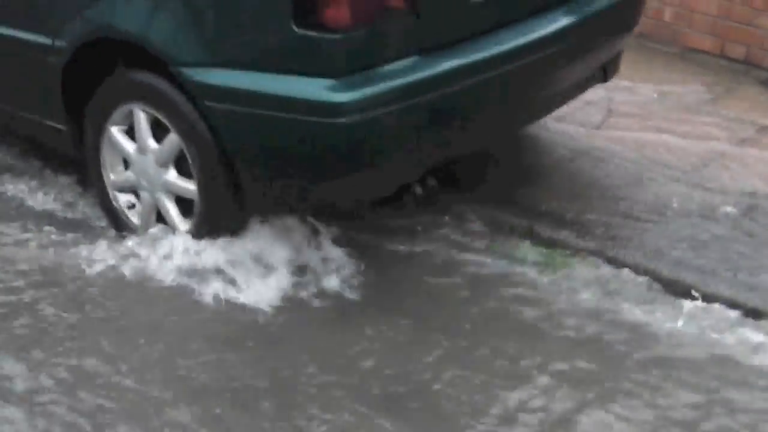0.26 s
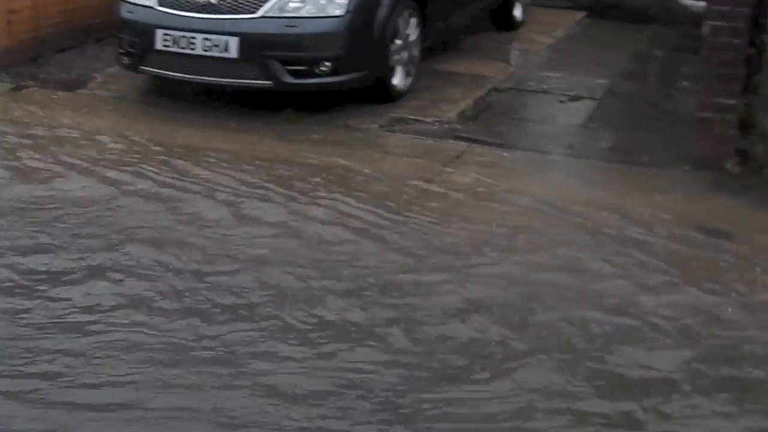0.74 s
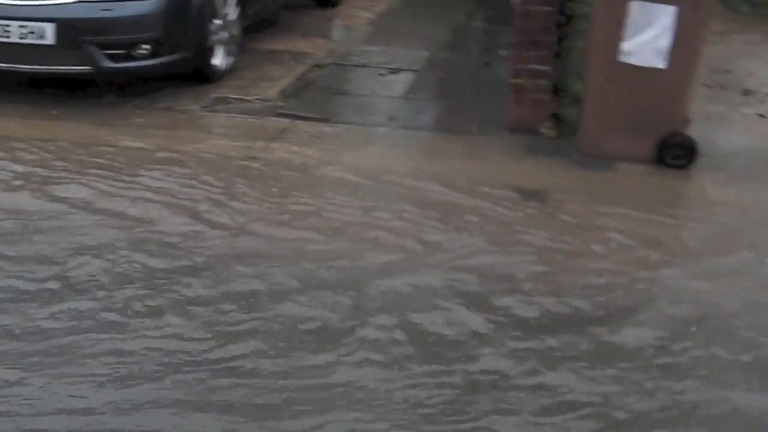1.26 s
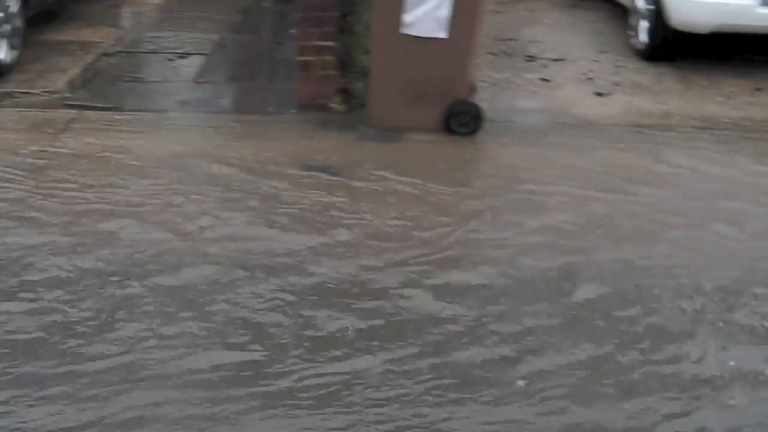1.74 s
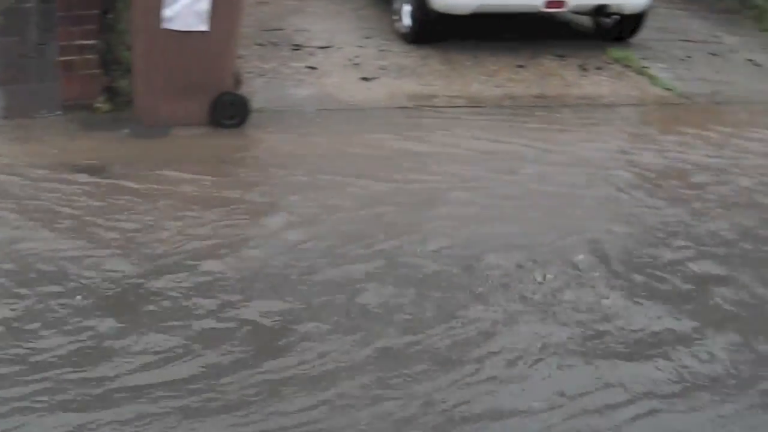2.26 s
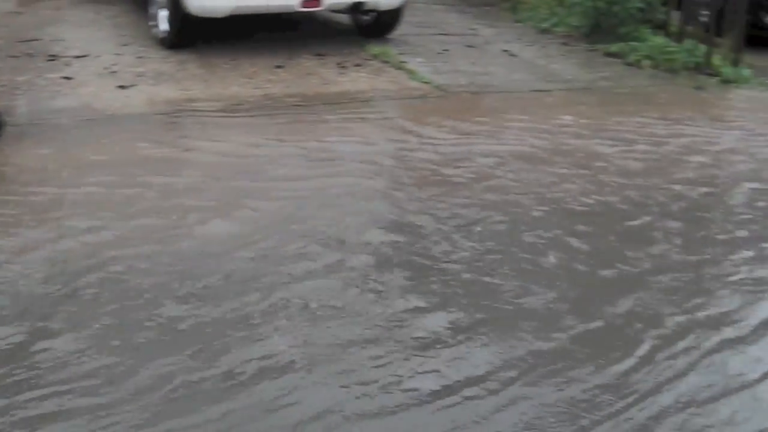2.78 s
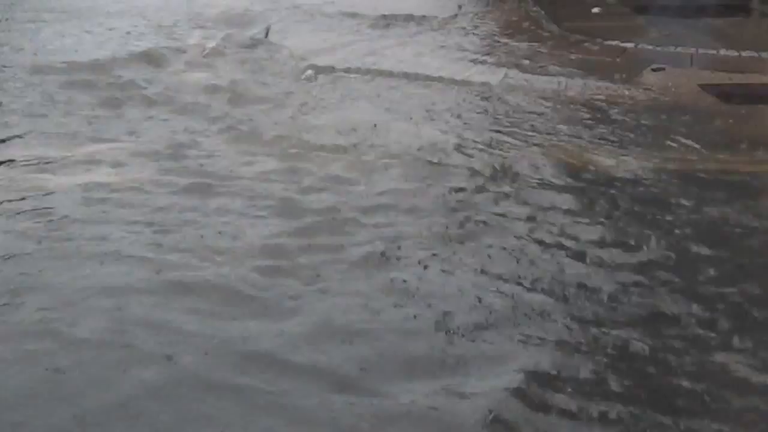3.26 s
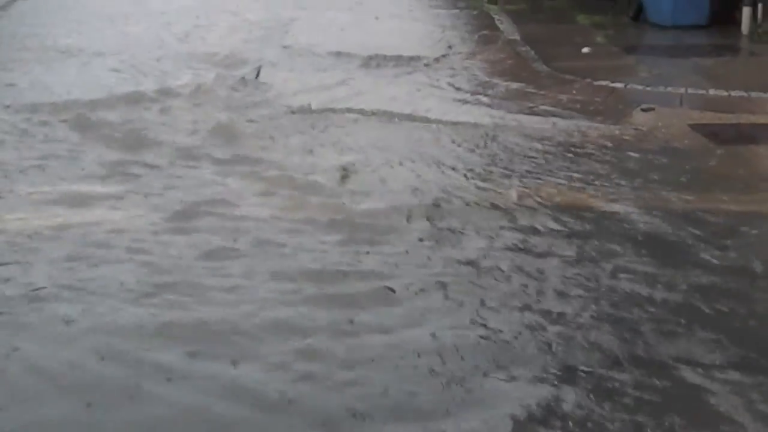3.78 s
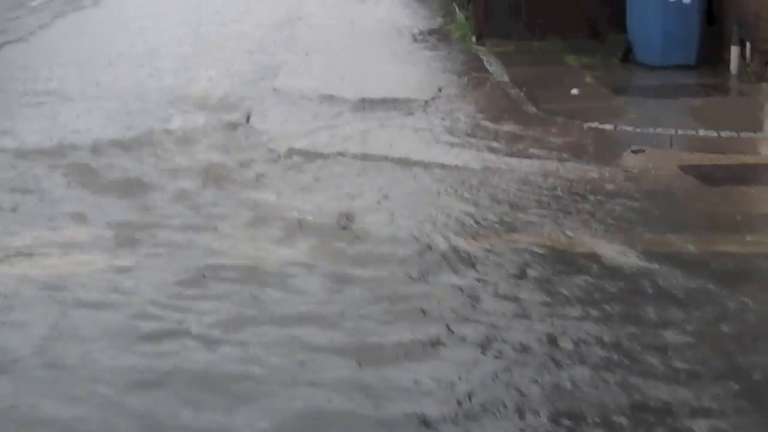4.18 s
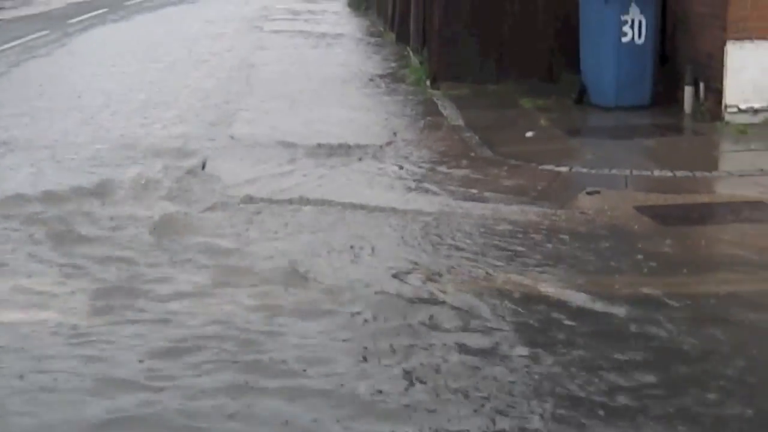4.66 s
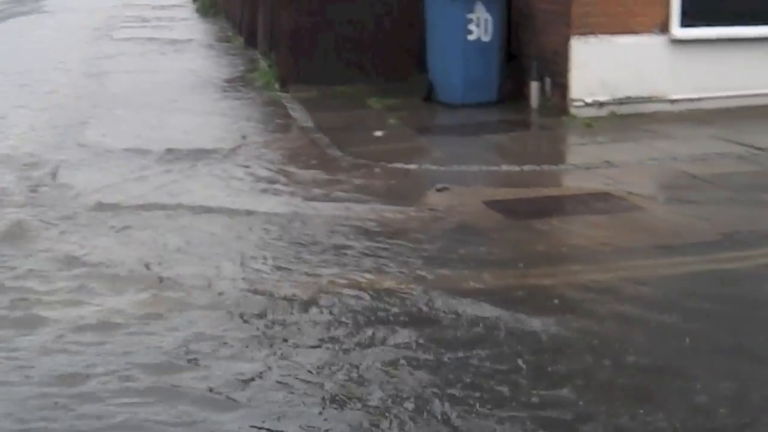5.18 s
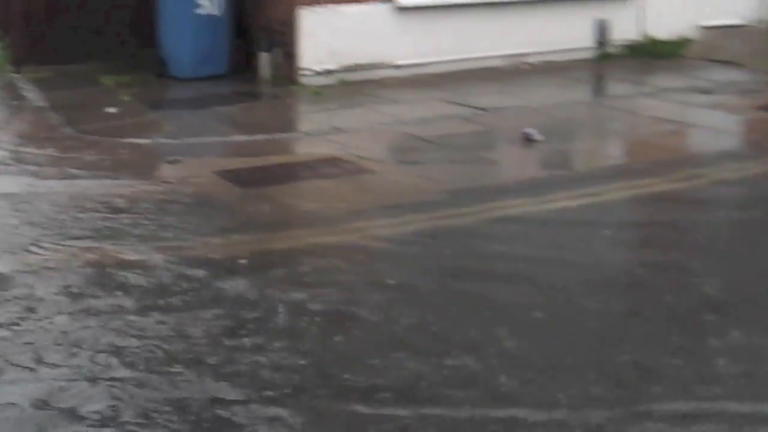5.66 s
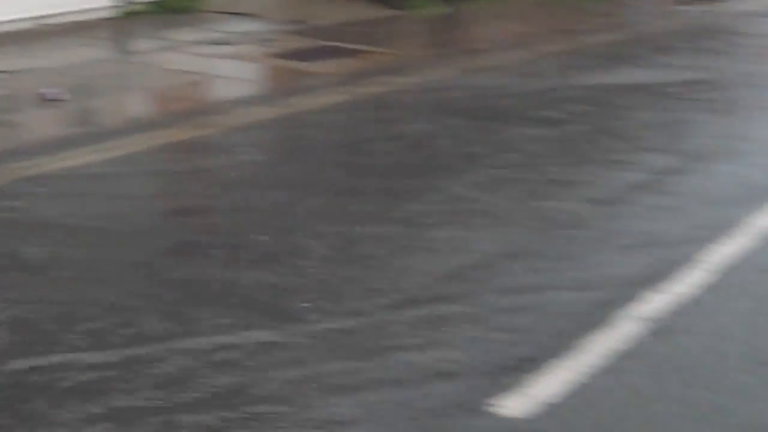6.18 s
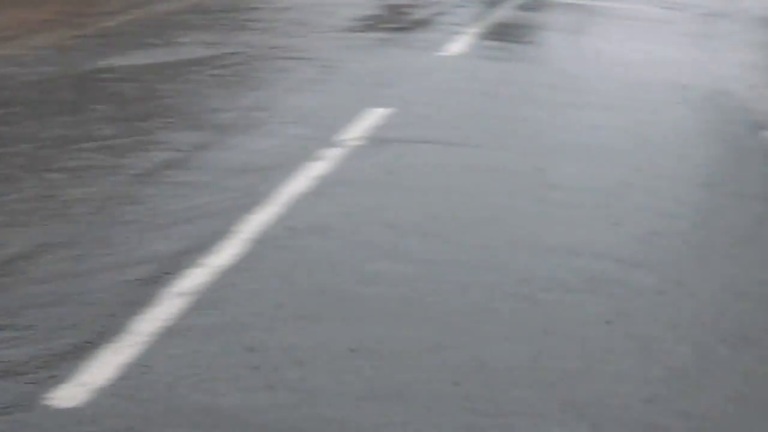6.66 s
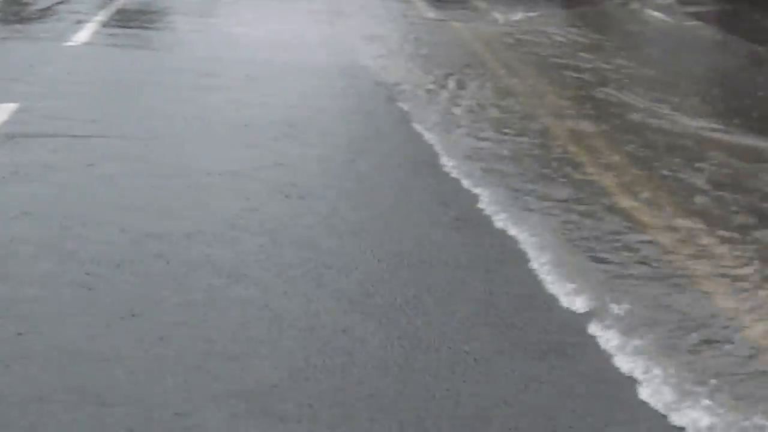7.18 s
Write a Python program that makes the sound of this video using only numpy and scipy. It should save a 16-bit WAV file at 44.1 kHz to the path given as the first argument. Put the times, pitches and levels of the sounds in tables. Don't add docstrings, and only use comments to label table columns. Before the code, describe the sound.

A brief loud rush of water against a wheel cuts to quiet shallow flow with drips and birds, then a fuller, foaming street stream draws near.

```python
import sys
import numpy as np
from scipy import signal
from scipy.fft import rfft, irfft, dct, next_fast_len
from scipy.io import wavfile
from scipy.ndimage import uniform_filter1d

SR = 44100
rng = np.random.default_rng(int(sys.argv[2]) if len(sys.argv) > 2 else 0)


def to_wav(s):
    ch = np.atleast_2d(s).T
    pcm = np.round(np.clip(ch, -1, 1) * 32767)
    wavfile.write(sys.argv[1], SR, pcm.astype(np.int16))


def level_to_linear(level):
    exponent = np.asarray(level, float) / 20
    return 10 ** exponent


N = 327654
PADDED = next_fast_len(N)
HZ = np.maximum(np.fft.rfftfreq(PADDED, 1 / SR), 1)
TIME = np.arange(N) / SR


def rms_one(x):
    return x / np.sqrt(np.mean(x ** 2) + 1e-20)


def at_hz(points, hz):
    table_hz, values = np.transpose(points)
    return np.interp(np.log(hz), np.log(table_hz), values)


def drift(rate_hz, size):
    points = rng.standard_normal(int(size / SR * 400) + 2)
    r = np.exp(-2 * np.pi * rate_hz / 400)
    slow = rms_one(signal.lfilter([1], [1, -2 * r, r * r], points))
    return np.interp(np.arange(size) / SR * 400, np.arange(len(slow)), slow)


def ring(push, hz, t60_s):
    r = level_to_linear(-60 / (t60_s * SR))
    w = 2 * np.pi * hz / SR
    return signal.lfilter([0, np.sin(w)], [1, -2 * r * np.cos(w), r * r], push + 1e-18)


def add(track, start_s, sound):
    i = round(start_s * SR)
    track[..., i:i + sound.shape[-1]] += sound[..., :N - i]


# frequency in Hz, left-right likeness 0-1.
PORT_LIKENESS = [(60, 1), (290, 0.87), (640, 0.96), (1400, 1), (3100, .75), (6800, 0.36), (15000, 0.3)]
# frequency in Hz, left lead in radians.
PORT_LEAD = [(60, 1), (1200, -0.33), (2500, -0.5), (4390, -1.64), (5770, -2.5), (7240, -4.5), (16000, -4.5)]
# frequency in Hz, left minus right in dB.
PORT_TILT = [(60, 0), (110, 1.5), (200, 0.5), (380, 1), (700, 1), (1290, 0), (2380, 1), (4400, 3.0),
             (8120, -0.5), (15000, 0.5)]


def ports(common, apart, off_centre):
    hz = np.maximum(np.fft.rfftfreq(len(common), 1 / SR), 1)
    alike = np.clip(at_hz(PORT_LIKENESS, hz), 0, 1)
    left = rfft(common)
    turned = left * np.exp(-1j * off_centre * at_hz(PORT_LEAD, hz))
    right = alike * turned + np.sqrt(1 - alike ** 2) * rfft(apart)
    half = level_to_linear(at_hz(PORT_TILT, hz) / 2)
    return np.array([left * half, right / half]), hz


def clicks(per_s, spread_db, size):
    born = rng.random(size) < per_s / SR
    strength = level_to_linear(spread_db * np.minimum(rng.exponential(1, size), 4))
    return rms_one(born * strength * rng.choice([-1, 1], size))


def bubbles(per_s, size, cycles=11.0):
    born = clicks(per_s, 4.8, size)
    dealt = rng.integers(0, 24, size)
    total = np.zeros(size)
    for k, hz in enumerate(np.geomspace(300, 15000, 24)):
        total += ring(born * (dealt == k), hz, cycles / hz) * hz
    return rms_one(total)


# frequency in Hz, level in dB per Hz.
WHEEL_COLOUR = [(24, -56), (40, -41), (127, -21.5), (278, -18.5), (523, -6.5), (763, -9.5), (1090, -5),
                (2140, -5), (6830, -13), (7950, -19), (9010, -16), (14900, -20), (16500, -39)]
SHEET_COLOUR = [(24, -55), (40, -18), (104, -8), (286, -15), (387, -6.5), (824, -5), (1190, -5.5),
                (2130, -8.5), (4000, -9.5), (6400, -12.5), (7400, -20), (9000, -21), (12800, -24),
                (16500, -19.5)]
STREAM_COLOUR = [(24, -41), (40, -11), (113, -8), (286, -15), (470, -4.5), (708, -4.5), (1160, -1.5),
                 (2330, -2), (3820, -5.5), (6300, -10.5), (7400, -16.5), (9000, -16.5), (12500, -17.5),
                 (16500, -25)]
# patchiness in dB, bubbles per s, bubble share 0-1, rain ticks per s, tick level over rush in dB,
# off-centre 0-1.
WATER_TEXTURE = [
    (1, 2500, 0.2, 270, -16., 0.42),
    (1.37, 1200, 0.17, 40, -14., .9),
    (0.95, 2500, 0.24, 60, -15., 0.82),
]
# time in seconds, gain in dB.
WATER_NEARNESS = [
    [(0, -0.5), (.1, 1.7), (.23, 0.4), (.29, -3)],
    [(.45, 1.5), (1.1, 2.5), (1.8, 0.5), (2.2, -1), (2.6, -1), (3.2, -1.5)],
    [(3.4, -3.5), (3.55, -2.5), (4.3, -1.5), (5.2, -2.5), (5.8, -.5), (6.1, 1), (6.45, 3.), (7.43, 3.5)],
]
# rush level in dB, then the share of nearness gain taken by rumble, rush, fizz, spray.
WATER_FOLLOW = [
    (-28., .8, 1.15, 0.59, .7),
    (-42., -0.29, .1, .05, 0.96),
    (-37.5, -0.012, -0.16, 1.17, .8),
]


def water(nearness, follow, colour, span_s, texture):
    start, stop = int(span_s[0] * SR), min(int(span_s[1] * SR), N)
    size = next_fast_len(stop - start)
    patchy_db, bubbles_per_s, share, ticks_per_s, tick_db, off_centre = texture
    share = np.clip(share, 0, 1)
    sources = []
    for port in range(2):
        hiss = np.sqrt(1 - share) * rng.standard_normal(size)
        foam = np.sqrt(share) * bubbles(bubbles_per_s, size)
        ticks = level_to_linear(tick_db) * clicks(ticks_per_s, 1.6, size)
        sources.append(hiss + foam + ticks)
    pair, hz = ports(*sources, off_centre)
    pair = pair * level_to_linear(at_hz(colour, hz))
    pair = pair / np.std(irfft(pair * ((hz > 300) & (hz < 1500)), size))
    near_db = np.interp(TIME[start] + np.arange(size) / SR, *np.transpose(nearness))
    rush_db, *shares = follow
    together = drift(5.0, size)
    out = np.zeros((2, size))
    for octave in np.arange(4.5, 14.6, .5):
        band = np.cos(np.pi * np.clip(np.log2(hz) - octave, -.5, .5)) ** 2
        swing_db = near_db * np.interp(octave, np.log2([150, 900, 2800, 8000]), shares)
        flicker_db = patchy_db * (0.42 * together + drift(12.0, size))
        out += level_to_linear(rush_db + swing_db + flicker_db) * irfft(pair * band, size)
    track = np.zeros((2, N))
    add(track, start / SR, out)
    return track


# time in seconds, peak level in dB.
BODY_BUMPS = [
    (0.101, -32),
    (0.999, -45),
    (1.338, -46),
    (1.705, -28),
    (3.981, -35),
    (4.347, -41),
    (4.959, -48),
    (5.567, -45),
    (5.979, -39),
    (6.217, -37),
]


def body_bumps():
    push = np.zeros(N)
    for s, peak_db in BODY_BUMPS:
        push[round(s * SR)] = level_to_linear(peak_db)
    grip = ring(push, 114, 0.03) + level_to_linear(0.5) * ring(push, 146, 0.046)
    return signal.lfilter(*signal.butter(2, 45, "high", fs=SR), grip)


# start in seconds, length in seconds, start pitch in Hz, level in dB.
PIPER_NOTES = [(.375, 0.12, 6480, -45), (.54, .05, 6330, -47), (.92, 0.056, 6260, -40),
               (1.0, 0.087, 6300, -53), (1.29, 0.068, 6480, -49), (1.39, 0.091, 6530, -45.5),
               (1.54, 0.054, 6400, -42), (1.6, 0.13, 6350, -48), (1.71, .05, 6400, -51),
               (1.76, .16, 6430, -47), (1.92, .05, 6380, -51), (1.97, 0.14, 6420, -47.5),
               (2.12, .08, 6380, -56)]
# start in seconds, length in seconds, start pitch in Hz, level in dB.
WARBLER_NOTES = [
    (1.02, .06, 3920, -48),
    (2.118, .115, 4455, -42),
]


def bird(notes, sag_hz, sag_s, flutter_db, waver_hz):
    out = np.zeros(N)
    waver = waver_hz * drift(61.0, N)
    flutter = flutter_db * drift(50.0, N)
    for s, length_s, hz, level_db in notes:
        t = np.arange(int(length_s * SR)) / SR
        now = slice(round(s * SR), round(s * SR) + len(t))
        edge = np.clip(np.minimum(t, length_s - t) / .011, 0, 1)
        pitch = hz - sag_hz * (1 - np.exp(-t / sag_s)) + waver[now]
        tone = np.sin(2 * np.pi * np.cumsum(pitch) / SR)
        out[now] += edge * level_to_linear(level_db + 6.0 + flutter[now]) * tone
    return out


# time in seconds, peak level in dB, pitch in Hz.
PLAIN_DROPS = [(.4938, -33, 1540), (.5082, -23, 2050), (.5202, -20, 3680), (0.5425, -21, 3620),
               (0.5734, -18.5, 2400), (.624, -24.5, 1640), (.7791, -33, 3750), (1.337, -19.5, 5000),
               (1.3698, -25, 3260), (1.942, -32, 3200), (2.0418, -33, 1580), (2.1296, -23, 4260),
               (2.3203, -27.5, 1760), (3.146, -29, 3250), (3.1814, -26, 2580), (3.4364, -27, 1920),
               (3.4994, -26, 2380), (3.782, -22, 2400), (3.9824, -23, 2400), (4.2968, -19, 4600),
               (5.241, -22, 2300), (5.5004, -20.5, 2010), (6.101, -27, 1670), (6.2892, -18, 3000),
               (6.3344, -21, 2790), (6.4794, -17.5, 2270), (6.5546, -21, 1990), (6.8994, -20, 2670)]
# time in seconds, peak level in dB, pitch in Hz, cycles rung, crack level in dB.
SLAPS_AND_PLINKS = [
    (2.285, -26.5, 1500, 7.3, 6.5),
    (2.62, -29, 2370, 56, -15),
    (3.0447, -6, 1120, 4.3, -19),
    (3.7234, -28, 5500, 8., 4),
    (3.9395, -23.5, 4000, 13, -2.5),
    (6.8563, -17.5, 2870, 55., -8),
    (7.258, -22.5, 3500, 10., 5.5),
    (4.3484, -14.5, 4000, 25, -5.5),
    (6.685, -16, 1090, 4., -1),
]


def drops():
    out, t = np.zeros(N), np.arange(900) / SR
    plain_cycles, plain_crack_db = 15., -6.
    snap_s = .00006
    snap = level_to_linear(-2.5) * np.gradient(np.exp(-(t / snap_s - 3) ** 2)) * snap_s * SR
    rows = SLAPS_AND_PLINKS + [(*drop, plain_cycles, plain_crack_db) for drop in PLAIN_DROPS]
    for s, peak_db, hz, cycles, crack_db in rows:
        decay = level_to_linear(-60 * t * hz / cycles)
        tone = -np.sin(2 * np.pi * hz * t * (1 + 5.0 * t)) * decay * (1 - np.exp(-t / .0003))
        splash = rng.standard_normal(900) * np.exp(-t / 0.00098)
        crack = np.gradient(ring(splash, max(hz, 3000), 0.00081))
        crack = crack / np.abs(crack).max() + snap
        add(out, s, level_to_linear(peak_db + 5.0) * (tone + level_to_linear(crack_db) * crack))
    return out


# time in seconds, peak level in dB, left-over-right pan in dB.
SPRAY_SPITS = [(0.7384, -33.5, 0), (0.9456, -35, -5), (1.0975, -39, -8), (2.9227, -36, -2), (3.7, -35, -8),
               (3.7237, -24, -2), (4.0474, -35, -4), (4.165, -33, 0.0), (4.297, -25.5, 4),
               (4.516, -23.5, -8), (5.071, -30.5, -6), (5.1103, -32, 2), (5.1696, -37, -9),
               (5.5922, -34, -9), (5.7636, -28, 6), (6.2097, -20, 5), (6.2616, -25, -6),
               (6.2904, -24.5, -4.5), (6.337, -19.5, -2), (6.4645, -26.5, -1), (6.765, -19.5, 1),
               (7.363, -28, -9)]


def spits():
    out, t = np.zeros((2, N)), np.arange(600) / SR
    for s, peak_db, pan_db in SPRAY_SPITS:
        gain = level_to_linear(peak_db + 5.5 + pan_db * np.array([[.5], [-.5]]))
        add(out, s, gain * rng.standard_normal((2, 600)) * np.exp(-t / 0.0013))
    return signal.sosfilt(signal.butter(3, 8000, "high", fs=SR, output="sos"), out + 1e-18)


# time in seconds, pitch in Hz, level in dB.
CHATTER_PUFFS = [(1.39, 4600, -48), (1.45, 3980, -52), (1.51, 4000, -53), (1.66, 4500, -50),
                 (1.83, 4950, -41), (1.98, 4950, -42), (2.27, 4900, -40), (2.37, 4360, -39),
                 (2.45, 4900, -42), (2.54, 4600, -43), (2.62, 4630, -39), (2.71, 4700, -40),
                 (2.8, 4700, -43), (2.89, 4500, -40), (2.98, 4700, -43)]


def chatter():
    out, swell = np.zeros(N), np.hanning(2200)
    for s, hz, level_db in CHATTER_PUFFS:
        throat = ring(ring(rng.standard_normal(2200), hz, .003), hz, .003)
        add(out, s - .025, level_to_linear(level_db) * swell * rms_one(throat))
    return out


# frequency in Hz, level in dB, t60 in seconds.
HOUSING_MODES = [(406, -19.5, 0.021), (1260, 0.3, 0.012), (2400, -14, 0.01), (3480, -12.5, 0.0064),
                 (5500, -12, 0.0025), (8600, -23, 0.0026), (11500, -30, .002), (14500, -23, .002)]


def housing_knock():
    out, t = np.zeros((2, N)), np.arange(1500) / SR
    for hz, level_db, t60_s in HOUSING_MODES:
        rattle = rng.standard_normal((2, 1500)) * np.exp(-(t / 0.0017) ** 2)
        rattle *= 0.26 * min(hz / 3500, 1) ** 2
        hit = 0.52 * (t == t[8])
        add(out, 1.7046, level_to_linear(level_db) * ring(rattle + hit, hz, t60_s))
    return out


# start in seconds, length in seconds, start pitch in Hz, end pitch in Hz, peak in dB.
DRAIN_GULPS = [
    (3.83, .07, 370, 870, -35),
    (4.0, 0.0547, 287, 640, -36),
    (4.065, 0.023, 400, 440, -36),
    (4.15, 0.024, 384, 430, -36.5),
    (4.478, 0.054, 280, 590, -37.5),
    (4.25, 0.033, 373, 440, -36.5),
    (2.77, 0.031, 487, 570, -38),
]


def gulps():
    out = np.zeros(N)
    for s, length_s, low_hz, high_hz, peak_db in DRAIN_GULPS:
        part = np.arange(int(length_s * SR)) / (length_s * SR)
        pitch = low_hz * (high_hz / low_hz) ** part
        tone = np.sin(2 * np.pi * np.cumsum(pitch) / SR)
        add(out, s, level_to_linear(peak_db - 3.5) * np.sin(np.pi * part) * tone)
    return out


# from time in seconds, threshold in spreads.
BAND_SCARCITY = [(0, -2.5), (.36, .35), (3.31, -.1), (5.93, 1.0), (6.29, 1.6), (6.55, 0), (6.76, -2.2)]
# frequency in Hz, added threshold in spreads.
BAND_THRESHOLD = [(5600, -30), (6000, -3.5), (6500, -1.8), (7000, -.2), (7500, .9), (7900, 2.4), (8400, .1),
                  (9300, -.8), (12700, -1.1), (14000, .1), (15600, .4), (16000, 1), (16200, 7)]
# frequency in Hz, ratio for the sum, ratio for the difference.
ROUNDING_STEP = [(300, .05, .4), (700, .1, 1.3), (1200, .15, 1.8), (2200, .2, 1.2), (3500, .25, .65),
                 (5800, .45, .6), (7000, 1.0, 1.2), (16000, 1.1, 1.2)]


def coarse_bands(x):
    frames, lead = N // 1024 + 2, 1024 - 506
    window = np.sin(np.pi * (np.arange(2048) + .5) / 2048)
    padded = np.pad([x[0] + x[1], x[0] - x[1]], ((0, 0), (lead, 3072)))
    index = 1024 * np.arange(frames)[:, None] + np.arange(2048)
    a, b, c, d = np.split(padded[:, index] * window, 4, axis=2)
    folded = np.concatenate([-c[..., ::-1] - d, a - b[..., ::-1]], axis=2)
    lines = dct(folded, type=4, norm="ortho").reshape(2, frames, 64, 16)
    band_db = 10 * np.log10(np.mean(lines ** 2, axis=3) + 1e-20)
    usual_db = uniform_filter1d(band_db, size=7, axis=1)
    hz, s = (np.arange(64) + .5) * SR / 128, index[:, 506] / SR

    step_hz, *ratios = np.transpose(ROUNDING_STEP)
    ratio = np.array([np.interp(hz, step_hz, r) for r in ratios])
    steps = (level_to_linear(usual_db) * ratio[:, None])[..., None]
    lines = steps * np.round(lines / steps)

    luck = uniform_filter1d(rng.standard_normal((frames, 64)), size=2, axis=0)
    luck = uniform_filter1d(luck, size=2, axis=1)
    luck = rms_one(luck + .25 * rng.standard_normal((frames, 1)))
    luck = luck + (band_db - usual_db)[0] / 3.5
    since_s, scarcity = np.transpose(BAND_SCARCITY)
    threshold = scarcity[np.searchsorted(since_s, s) - 1, None] + at_hz(BAND_THRESHOLD, hz)
    kept = luck > threshold
    lines *= np.array([kept, kept | (hz < 16100)])[..., None]

    first, second = np.split(dct(lines.reshape(2, frames, 1024), type=4, norm="ortho"), 2, axis=2)
    unfolded = np.concatenate([second, -second[..., ::-1], -first[..., ::-1], -first], axis=2) * window
    out = np.zeros_like(padded)
    for k in range(frames):
        out[:, index[k]] += unfolded[:, k]
    total, difference = out[:, lead:][:, :N]
    return np.array([total + difference, total - difference]) / 2


def scene():
    colours = (WHEEL_COLOUR, SHEET_COLOUR, STREAM_COLOUR)
    spans_s = [(0, .35), (.35, 3.3), (3.3, 7.5)]
    shots = zip(WATER_NEARNESS, WATER_FOLLOW, colours, spans_s, WATER_TEXTURE)
    flood = sum(water(*shot) for shot in shots)
    piper = bird(PIPER_NOTES, sag_hz=130., sag_s=.05, flutter_db=2.5, waver_hz=50.)
    warbler = bird(WARBLER_NOTES, sag_hz=467.0, sag_s=0.027, flutter_db=2.5, waver_hz=45.)
    points = np.pad(piper + warbler + drops() + chatter() + gulps(), (0, PADDED - N))
    pair, _ = ports(points, np.roll(points, 2), .9)
    return flood + irfft(pair, PADDED)[:, :N] + body_bumps() + spits() + housing_knock()


def low_pass(x):
    return signal.sosfilt(signal.butter(12, 16810, fs=SR, output="sos"), x)


# fade-in start, full, fade-out start, silent, all in seconds.
SHOT_FADES = [
    (-.1, -.05, .285, .343),
    (0.363, 0.398, 3.205, 3.287),
    (3.313, 3.373, 8.0, 8.1),
]


def record(dry):
    ramps = sum(np.interp(TIME, fade, [0, 1, 1, 0]) for fade in SHOT_FADES)
    fades = (ramps > 0) * (0.093 + 0.92 * ramps)
    gap_hz, gap_width_hz, gap_db, low_cut_hz = 7850, 290, -19.5, 20.0
    gap = level_to_linear(gap_db * np.exp(-((HZ - gap_hz) / gap_width_hz) ** 2))
    low_cut = HZ ** 2 / (HZ ** 2 + low_cut_hz ** 2)
    filtered = np.clip(irfft(rfft(dry, PADDED) * gap * low_cut, PADDED)[:, :N], -1, 1)
    floor = 2e-5 * rng.standard_normal((2, N)) * (ramps < .2)
    return low_pass(coarse_bands(filtered) * fades + floor)


dry = scene()
out = record(dry)
to_wav(out)
```